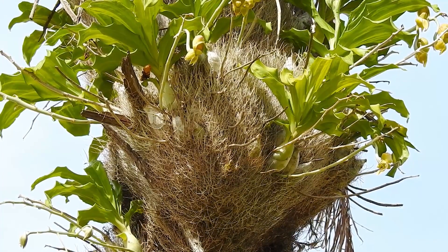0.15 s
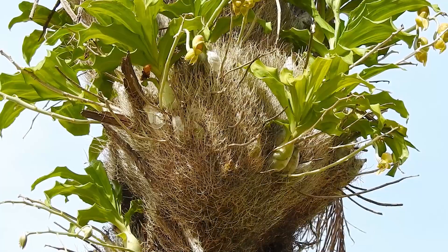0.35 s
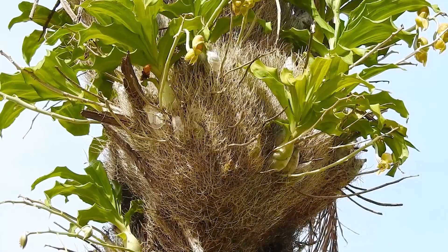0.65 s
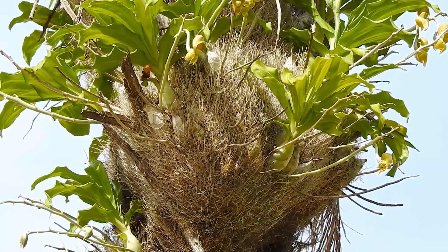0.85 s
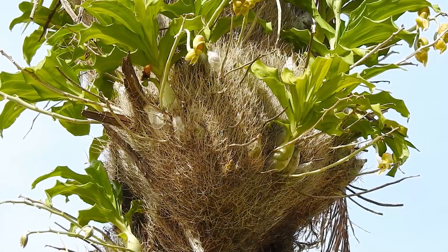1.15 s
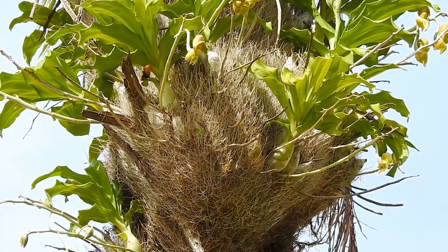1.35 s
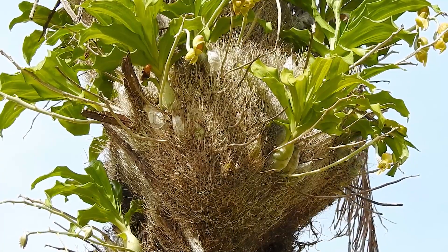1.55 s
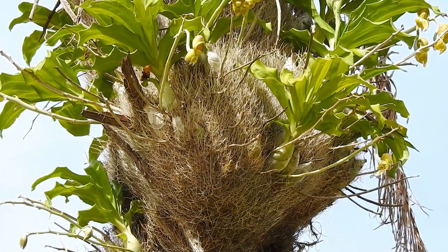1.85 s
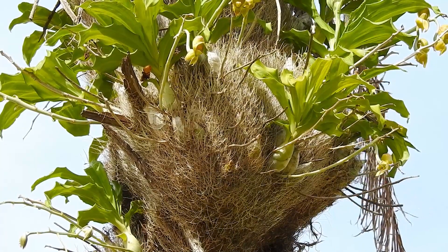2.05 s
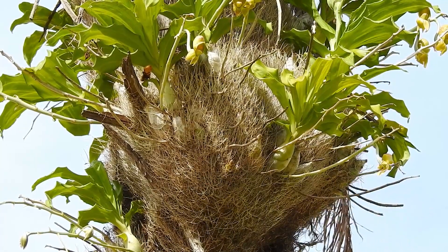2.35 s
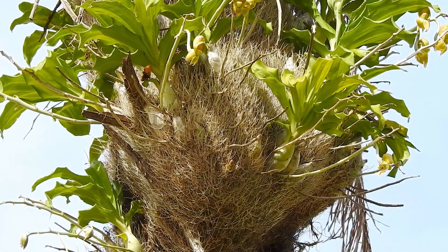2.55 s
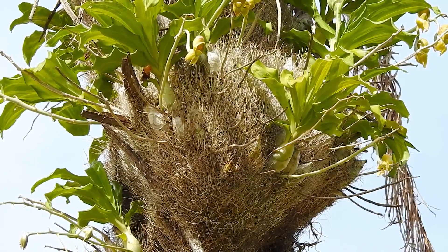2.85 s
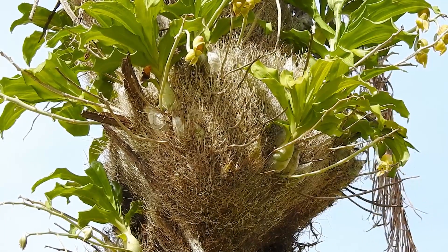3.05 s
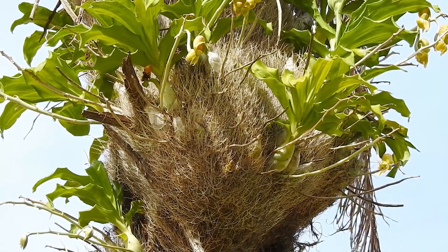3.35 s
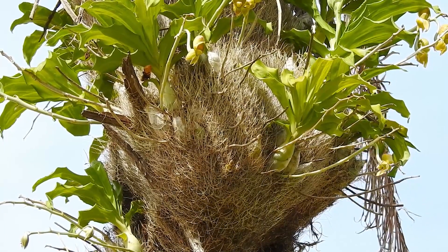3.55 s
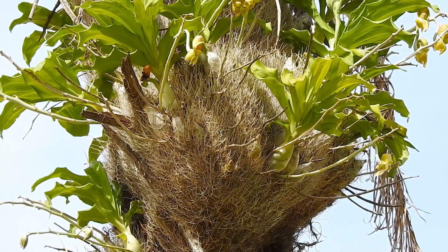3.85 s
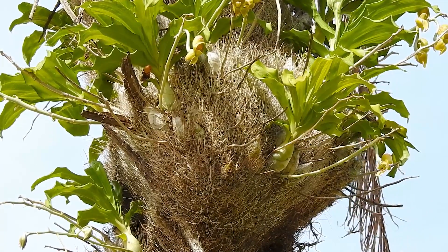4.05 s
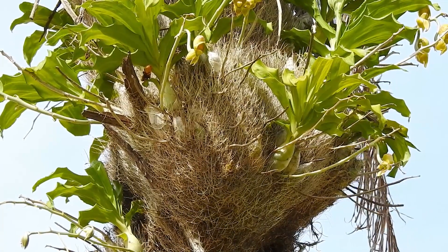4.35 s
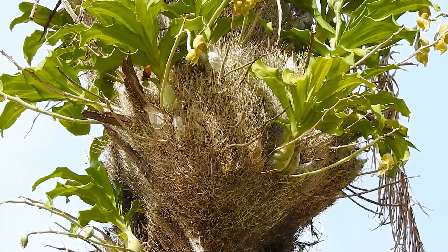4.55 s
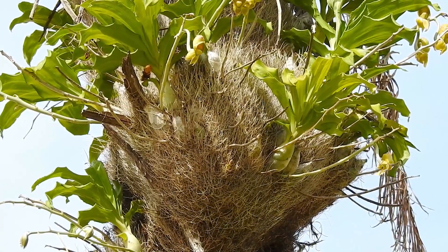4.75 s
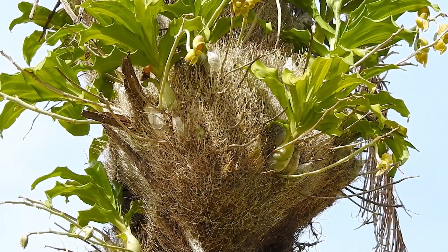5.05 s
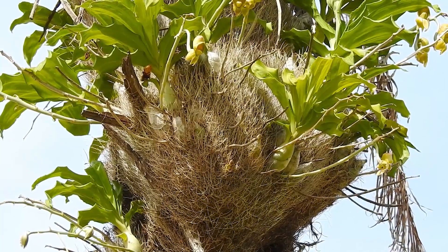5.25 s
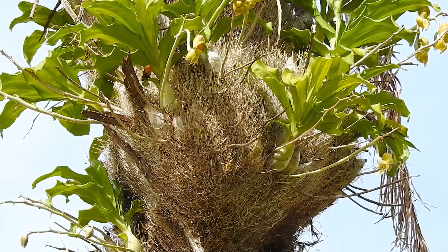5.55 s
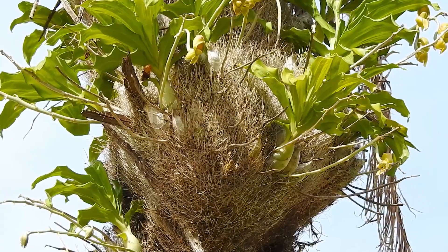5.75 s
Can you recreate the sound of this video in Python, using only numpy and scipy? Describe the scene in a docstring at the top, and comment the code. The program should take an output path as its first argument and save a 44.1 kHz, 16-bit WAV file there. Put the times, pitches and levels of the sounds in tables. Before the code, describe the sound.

Outdoors by a leafy tree, bursts of raspy high chips repeat about every second above constant breeze hiss and a very faint high whine.

```python
"""Outdoors by a tree, a small bird scolds with dry chips in runs of two or three, scattered by foliage.
Each chip is a plunging whistle with rough overtones, shaped by resonances and echoed by leaves and trees.
Thin far calls are smeared whistles over shaped noise (breeze, distance), a low hum, wind puffs and one tap.
The camera adds a faint whine of steady sines, and its gain control ducks the hush under every run."""
import sys
import numpy as np
from scipy import signal
from scipy.fft import rfft, irfft
from scipy.io import wavfile
from scipy.ndimage import uniform_filter1d, minimum_filter1d

SR = 44100
rng = np.random.default_rng(int(sys.argv[2]) if len(sys.argv) > 2 else 0)


def pcm_store(signal):
    """Save signal as 16-bit PCM."""
    levels = np.round(np.clip(np.atleast_2d(signal), -1, 1) * 32767)
    wavfile.write(sys.argv[1], SR, levels.astype(np.int16).T)


N = 260190
TIME = np.arange(N) / SR  # s


def from_db(db):
    """Logarithmic level: decibels to amplitude gain."""
    return 10 ** (np.asarray(db) / 20)


def rms_one(x):
    """Normalization: scale to an rms of 1."""
    return x / np.sqrt(np.mean(x ** 2) + 1e-20)


def at_hz(points, hz):
    """Interpolation on a logarithmic frequency axis."""
    known_hz, values = np.transpose(points)
    return np.interp(np.log(np.maximum(hz, 1)), np.log(known_hz), values)


def swell(t, half_length):
    """Gaussian envelope around t = 0."""
    return np.exp(-.5 * (t / half_length) ** 2)


def drift(rate_hz, size):
    """Low-pass noise: a random wander of rms 1, its spectrum falling as a Gaussian of width rate_hz."""
    hz = np.arange(size // 2 + 1) * SR / size
    spectrum = rfft(rng.standard_normal(size)) * swell(hz, rate_hz)
    return rms_one(irfft(spectrum, size))


def stereo(mid, side, alike):
    """Interchannel correlation: two unrelated signals become a left and right of the given likeness."""
    alike = np.clip(alike, -1, 1)
    sign = np.array([[1], [-1]])
    return np.sqrt((1 + alike) / 2) * mid + np.sqrt((1 - alike) / 2) * side * sign


# spectrum of the outdoor hush: f/Hz, relative level per Hz/dB
HUSH = [(15, -13), (25, 2), (27, -6), (53, 0), (86, -1), (432, -2), (494, -2.5), (1840, -6.5), (2610, -6.5),
        (5550, -9), (6520, -7.5), (7450, -10), (12400, -12), (14200, -13.5), (15400, -11)]
# correlation of the hush at the two ears: f/Hz, left-right likeness/1
LIKENESS = [(40, 1), (120, 1), (250, 0.69), (500, 0.34), (1000, 0.093), (2500, 0.27), (6000, 0.39),
            (14000, 0.34)]
HUSH_DB = -50  # rms of the left-right mean


def hush():
    """Diffuse field: breeze in distant leaves and microphone hiss, alike in the bass, wide above."""
    hz = np.arange(N // 2 + 1) * SR / N
    alike = np.clip(at_hz(LIKENESS, hz), 0, .995)
    noise = stereo(*rfft(rng.standard_normal((2, N))), alike)
    noise = noise / np.sqrt(1 + alike)  # likeness leaves the spectrum of the mean unchanged
    noise = irfft(noise * from_db(at_hz(HUSH, hz)), N)
    return noise / noise.mean(0).std() * from_db(HUSH_DB)


# steady lines of the camera's electronics; the upper two beat: f/Hz
WHINE_HZ = [15674.3, 15734.2, 15746.8]
# their rms before the top cut: level/dB
WHINE_DB = [-79, -65, -70]


def whine():
    """Superposition and beats: steady sines picked up from the camera's picture circuits."""
    lines = sum(from_db(db) * np.sin(2 * np.pi * hz * TIME) for hz, db in zip(WHINE_HZ, WHINE_DB))
    return np.sqrt(2) * lines


HUM_HZ, HUM_DB = 103.5, -78  # mean pitch, rms level


def hum(wander=0.018):
    """Frequency modulation: a faint low drone, not quite steady."""
    pitch_hz = HUM_HZ * (1 + wander * drift(2.14, N))
    phase = 2 * np.pi * np.cumsum(pitch_hz) / SR
    return np.sqrt(2) * from_db(HUM_DB) * np.sin(phase)


# puffs of wind on the microphone: middle t/s, half length t/s, level before the high-pass/dB
PUFFS = [(.04, 0.045, -55), (0.872, .012, -44), (1.16, 0.015, -44.5), (1.505, 0.075, -51)]


def wind(top_hz=34, bottom_hz=34):
    """Turbulent pressure: soft low bumps of air on the microphone."""
    strength = sum(from_db(db) * swell(TIME - s, half_length) for s, half_length, db in PUFFS)
    bumps = strength * drift(top_hz, N)
    high_pass = signal.butter(2, bottom_hz, "high", fs=SR, output="sos")
    return signal.sosfilt(high_pass, bumps)


# the bird's runs: first chip t/s, gap to the second t/s, number of chips/1, first fundamental level/dB
RUNS = [(.1363, 0.087, 3, -33), (0.8897, .086, 3, -32.5), (1.7709, .087, 3, -30.5), (2.6653, .0878, 3, -32),
        (3.4921, .0873, 3, -36), (3.8917, .09, 3, -34), (5.181, .092, 2, -34.5)]
# second and third chip, alike in every run: nominal pitch f/Hz, fundamental level/dB
FOLLOWERS = [(2920, -36), (2910, -35.5)]
GAP_SHARE = .788  # each gap relative to the one before
# opening chip: nominal pitch at the usual level, and its fall as the level rises
OPENING_HZ, OPENING_DB, FALL_HZ_PER_DB = 2925, -34, 61


def chips():
    """Rhythmic acceleration: an opening chip, lower the harder it is pushed, then quickening followers."""
    for s, gap_s, count, opening_db in RUNS:
        opening_hz = OPENING_HZ - FALL_HZ_PER_DB * (opening_db - OPENING_DB)
        run = [(opening_hz, opening_db), *FOLLOWERS][:round(count)]
        for pitch_hz, tone_db in run:
            yield s, pitch_hz, tone_db
            s = s + gap_s
            gap_s = gap_s * GAP_SHARE


# overtones from the second harmonic up: relative level/dB, peak after the fundamental's t/s, half length t/s
OVERTONES = [(-1.8, 0.00054, 0.004), (-2.5, 0.0022, 0.004), (-0.48, 0.0028, 0.0023), (-0.5, 0.0029, 0.0053)]
# resonances of throat and beak: f/Hz, gain level/dB
THROAT = [(1700, -14), (2450, -1.5), (3200, -5.5), (4200, -5), (4950, 1), (6500, -6.5), (7750, -0.5),
          (9200, -8), (9900, 4), (10900, -3), (11900, -6.5), (12500, -8), (13200, -11.5), (15500, -16)]


def chip(pitch_hz, tone_db, overtone_db, size, sweep=.075, settle_s=.003, end_share=.91, jitter=0.0343,
         tone_s=0.0038, tone_rough=1.0, usual_db=-35, clear=0.12, rasp_hz=950):
    """Source and filter: a whistle plunges in about 10 ms, with rough overtones, through resonances."""
    t = (np.arange(size) - size // 2) / SR
    glide = end_share + sweep * np.exp(np.minimum(-t / settle_s, 1.8))
    sounding_hz = pitch_hz * glide * (1 + jitter * drift(612, size))
    phase = 2 * np.pi * np.cumsum(sounding_hz) / SR

    def rasp(angle):
        """Random modulation: irregular vibration spreads a partial into a band."""
        return (drift(rasp_hz, size) * np.sin(angle) + drift(rasp_hz, size) * np.cos(angle)) / np.sqrt(2)

    rough = min(tone_rough * from_db(2 * (usual_db - tone_db)), 1)  # a stronger whistle is purer
    note = from_db(tone_db) * swell(t, tone_s) * (np.sin(phase) + rough * rasp(phase))
    for order, (level_db, late, half_length) in enumerate(OVERTONES, 2):
        partial = clear * np.sin(order * phase) + rasp(order * phase)
        note = note + from_db(overtone_db + level_db) * swell(t - late, half_length) * partial
    hz = np.arange(size // 2 + 1) * SR / size
    return irfft(rfft(note) * from_db(at_hz(THROAT, hz)), size)


OVERTONE_DB = -34.3  # reference for the overtones, the same in every chip


def bird():
    """Directivity: all the chips as sent out in one direction, each call drawing a fresh grain of rasp."""
    out = np.zeros(N + SR)
    for s, pitch_hz, tone_db in chips():
        note = chip(pitch_hz, tone_db, OVERTONE_DB, size=2048)
        start = max(round(s * SR) - len(note) // 2, 0)
        out[start:start + len(note)] += note
    return out[:N]


BRANCH_DELAY_S = .00303


def direct_path(x, branch_db=-7, pan_db=1.3):
    """Early reflection: the bird sits a little to the left; a near branch adds one quick echo."""
    echo = np.interp(TIME - BRANCH_DELAY_S, TIME, x)
    return (x + from_db(branch_db) * echo) * from_db([[pan_db], [-pan_db]])


def foliage(level_db, t60, build_s, leaf_hz, alike, pan_db, count):
    """Scattering: clumps of leaves return sprays of echoes; being small, leaves reflect treble best."""
    t, out = np.arange(SR // 2) / SR, 0
    decay = from_db(-60 * t / t60) * (1 - np.exp(-t / build_s))
    for _ in range(count):  # one direction of the bird per clump
        spray = stereo(*rng.standard_normal((2, len(t))), alike)
        spray = decay / np.linalg.norm(decay) * spray
        out = out + signal.oaconvolve(bird()[None], spray, axes=1)[:, :N] / np.sqrt(count)
    high_pass = signal.butter(2, leaf_hz, "high", fs=SR, output="sos")
    out = signal.sosfilt(high_pass, out)
    return out * from_db([[level_db + pan_db], [level_db - pan_db]])


# decay of the trees' ring: f/Hz, time to fall 60 dB t/s
TREES_T60 = [(2500, 0.44), (5000, 0.48), (8000, 0.96), (12000, 0.4)]


def trees(x, wet_db=-9.8, build_s=0.0067, alike=0.81):
    """Reverberation: a long faint tail from the surrounding trees, each band decaying at its own rate."""
    t, tail = np.arange(SR) / SR, 0
    edges = np.geomspace(1500, 16000, 9)  # Hz
    for low, high in zip(edges, edges[1:]):
        band_pass = signal.butter(2, [low, high], "band", fs=SR, output="sos")
        band = signal.sosfilt(band_pass, rng.standard_normal((2, SR)))
        tail = tail + band * from_db(-60 * t / at_hz(TREES_T60, np.sqrt(low * high)))
    tail = stereo(*tail, alike) * (1 - np.exp(-t / build_s))
    tail = rms_one(tail) / np.sqrt(SR)  # unit energy
    return from_db(wet_db) * signal.fftconvolve(x, tail, axes=1)[:, :N]


# a soft tap on the camera body: onset t/s, reference level/dB
TAP = (.3555, -47.5)
# modes of the body: f/Hz, level relative to the tap/dB, time to fall 60 dB t/s
BODY = [(260, -3, .04), (620, 9, .03), (940, -7, .015)]


def tap():
    """Modal decay: one touch sets the camera body ringing briefly."""
    s, level_db = TAP
    t = np.maximum(TIME - s, 0)
    out = 0
    for hz, db, t60 in BODY:
        fall_db = np.minimum(60 * t / t60, 200)
        out = out + from_db(level_db + db - fall_db) * np.sin(2 * np.pi * hz * t)
    return out


# far thin calls: middle t/s, half length t/s, pitch f/Hz, glide (Hz per s), level/dB
FAR_CALLS = [(.74, .092, 6900, 0, -56.5), (1.27, .07, 7040, 0, -59), (1.654, .085, 6800, 3500, -56.5),
             (2.1, .05, 5900, 0, -59), (2.59, .06, 6850, 1500, -63), (4.52, .07, 6550, 0, -60),
             (4.967, .06, 6700, 0.5, -61), (4.98, .025, 2550, 0, -53), (5.62, .12, 2675, 0, -59),
             (5.828, .03, 2595, 0, -54.5)]


def far_calls(smear_hz=300, wobble=0.0252):
    """Multipath fading: thin whistles, smeared by many echoes into narrow bands."""
    out = 0
    blur = stereo(drift(smear_hz, N), drift(smear_hz, N), 0.73)
    waver = 1 + wobble * drift(316, N)
    for s, half_length, pitch_hz, glide, db in FAR_CALLS:
        sounding_hz = (pitch_hz + glide * (TIME - s)) * waver
        phase = 2 * np.pi * np.cumsum(sounding_hz) / SR
        out = out + from_db(db) * swell(TIME - s, half_length) * blur * np.sin(phase)
    return out


def scene():
    """Superposition: the bird and its echoes over the background."""
    direct = direct_path(bird())
    near = foliage(level_db=2, t60=0.071, build_s=0.0045, leaf_hz=4440, alike=0.78, pan_db=0.5, count=2)
    far = foliage(level_db=1.0, t60=0.23, build_s=0.04, leaf_hz=3570, alike=0.72, pan_db=0.1, count=4)
    background = far_calls() + hush() + hum()
    return direct + near + far + trees(near + far) + background + wind() + tap() + whine()


def gain_control(x, threshold_db=-44, most_cut_db=5.0, hold_s=0.039, release_db_per_s=85, attack_s=0.00092):
    """Dynamic compression: loud sounds quickly pull the gain down; it holds briefly, then recovers."""
    power = uniform_filter1d(np.mean(x ** 2, axis=0), size=400)
    level_db = 10 * np.log10(np.maximum(power, 1e-12))
    cut_db = np.clip(level_db - threshold_db, 0, most_cut_db)
    # hold: the largest cut within the last hold_s
    half_hold = int(hold_s * SR / 2)
    cut_db = -minimum_filter1d(-cut_db, 2 * half_hold + 1, origin=half_hold)
    # release: the cut shrinks no faster than a straight line in dB
    recovery_db = release_db_per_s * TIME
    cut_db = np.maximum.accumulate(cut_db + recovery_db) - recovery_db
    pole = np.exp(-1 / (attack_s * SR))
    return x * from_db(-signal.lfilter([1 - pole], [1, -pole], cut_db))


CUTOFF_HZ = 15795


def record(dry):
    """Band limiting: gain control, a steep top cut and the converter's small offset."""
    offset = -.0039  # of full scale
    top_cut = signal.firwin(1501, CUTOFF_HZ, fs=SR)
    return signal.fftconvolve(gain_control(dry), top_cut[None], mode="same", axes=1) + offset


dry = scene()
out = record(dry)
pcm_store(out)
```